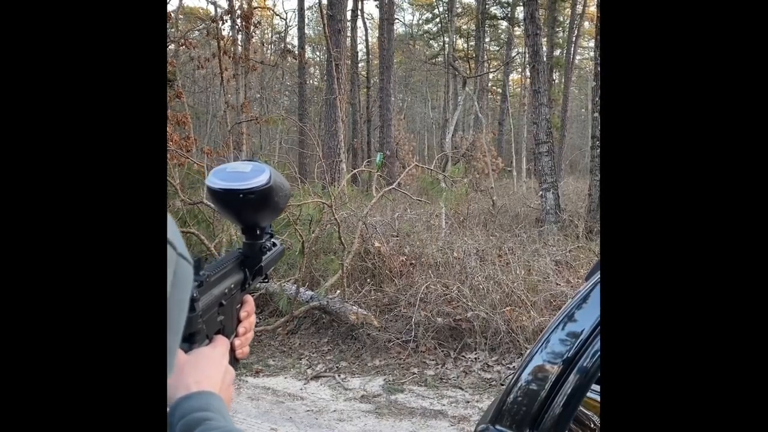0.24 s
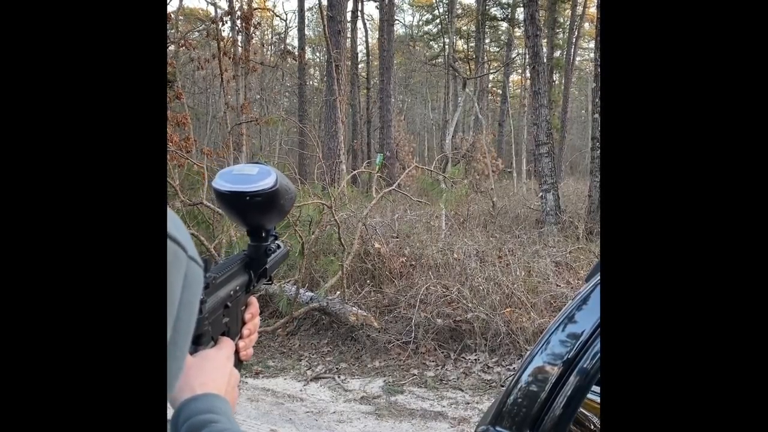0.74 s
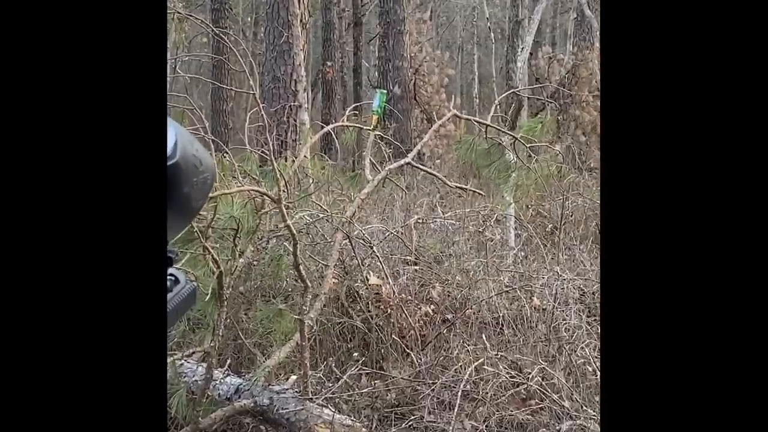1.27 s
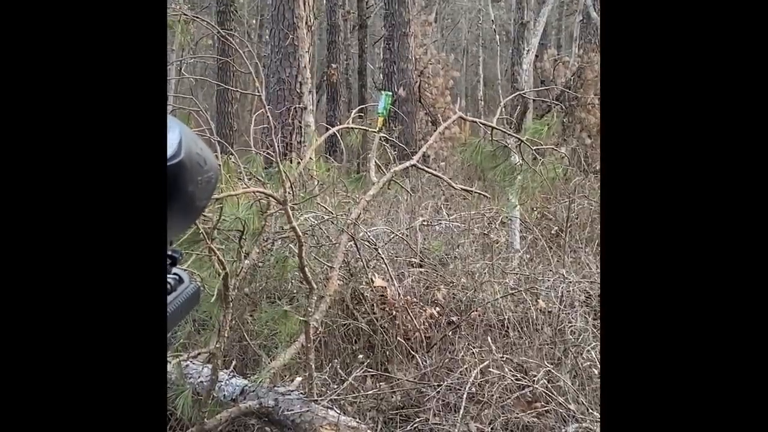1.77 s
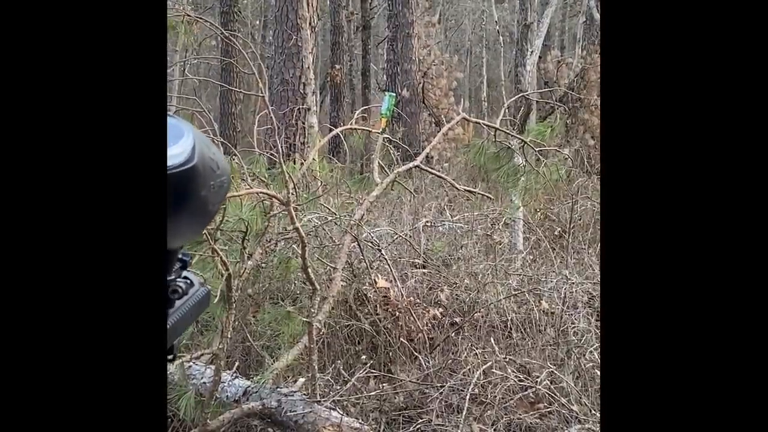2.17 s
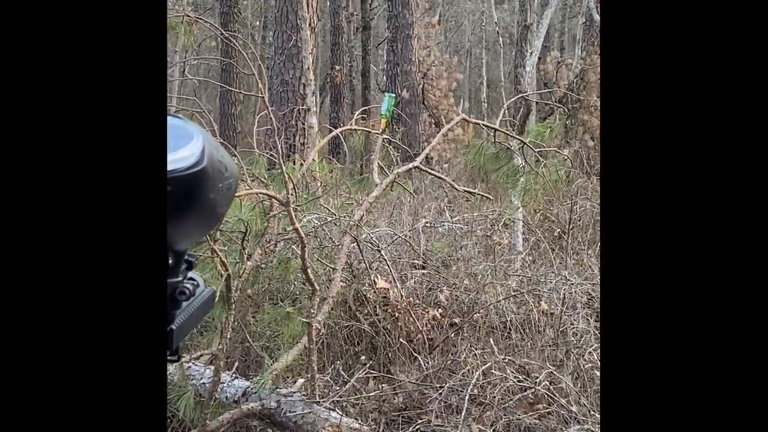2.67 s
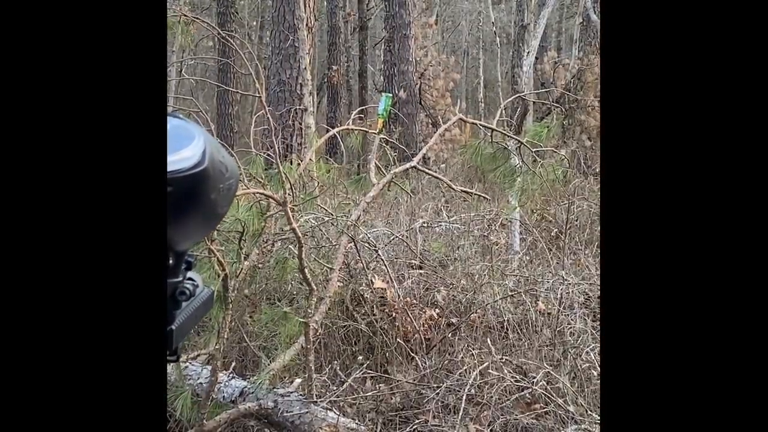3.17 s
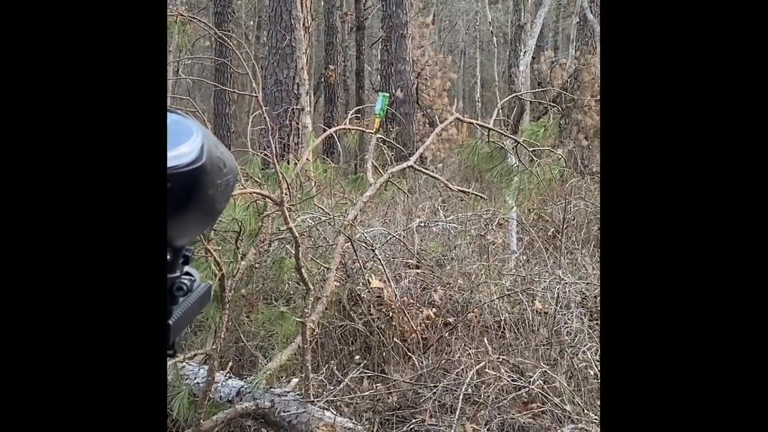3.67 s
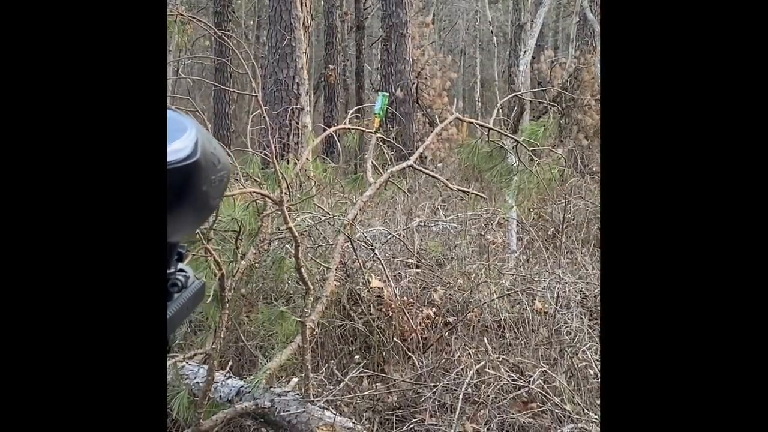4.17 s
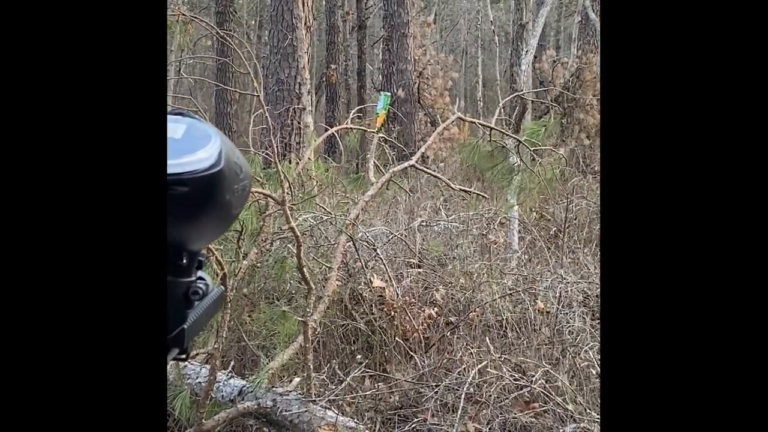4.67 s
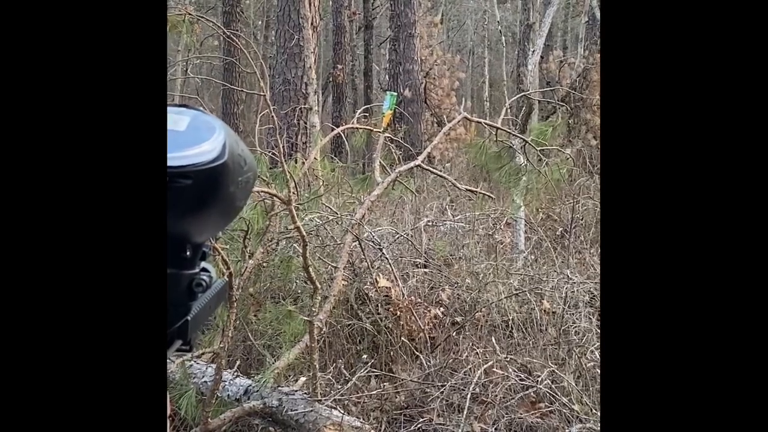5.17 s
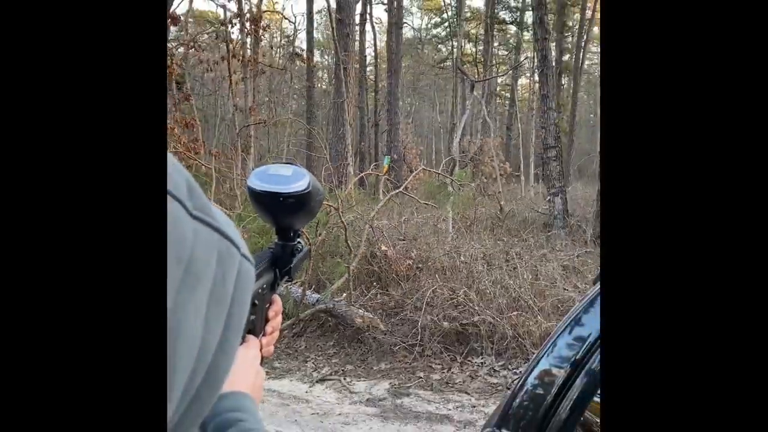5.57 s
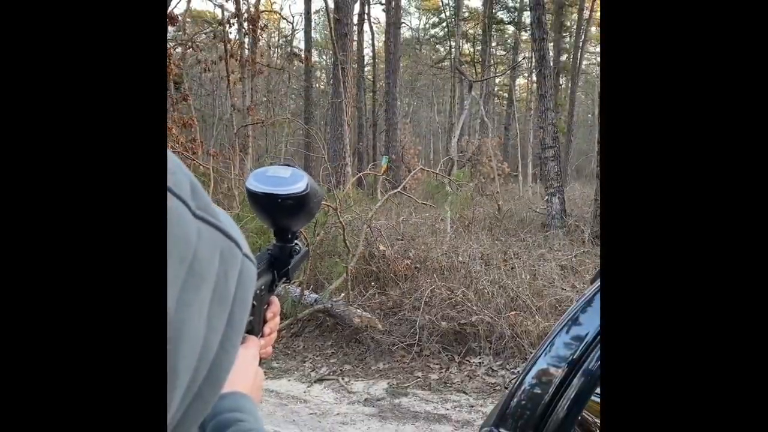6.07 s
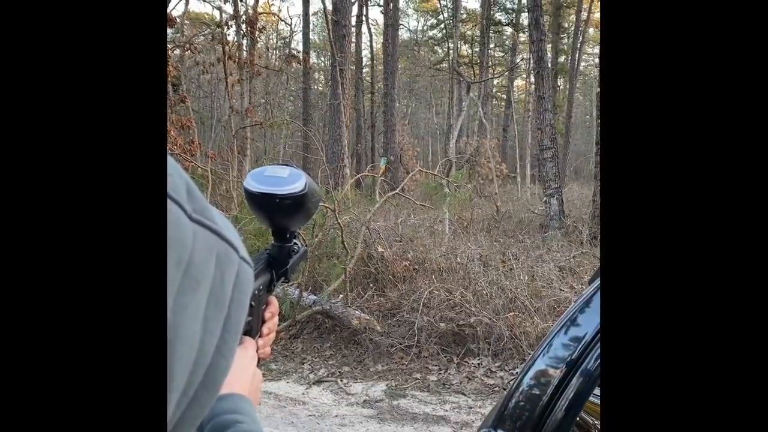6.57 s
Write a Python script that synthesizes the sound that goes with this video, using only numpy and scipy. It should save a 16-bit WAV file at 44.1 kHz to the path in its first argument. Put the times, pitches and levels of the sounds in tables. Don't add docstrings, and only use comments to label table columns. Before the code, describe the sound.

Outdoors in a pine wood, a parked engine idles low while a compressed-gas marker close to the microphone fires six separate shots. Each is a hard metallic clack with a short airy pop and low thump, then a brief diffuse echo from trunks. Four are followed a tenth of a second later by a ball bursting on a thin can, one barely audible. Small trigger clicks follow most shots, and the background dips after every pop.

```python
import sys
import numpy as np
from scipy import signal
from scipy.fft import rfft, irfft, next_fast_len
from scipy.io import wavfile
from scipy.ndimage import uniform_filter1d

SR = 44100
rng = np.random.default_rng(int(sys.argv[2]) if len(sys.argv) > 2 else 0)


def voltage_ratio(level):
    return 10 ** (np.asarray(level, float) / 20)


def generate_wav(sig):
    pcm = np.round(np.clip(np.atleast_2d(sig).T, -1, 1) * 32767).astype(np.int16)
    wavfile.write(sys.argv[1], SR, pcm)


N = 300762
TIME = np.arange(N) / SR


def on_log(hz, table, column):
    table = np.array(table, float)
    return np.interp(np.log(np.maximum(hz, 1)), np.log(table[:, 0]), table[:, column])


def noise(colour, seconds):
    size = int(seconds * SR)
    hz = np.fft.rfftfreq(size, 1 / SR)
    gain = voltage_ratio(on_log(hz, colour, 1)) * np.minimum(hz / colour[0][0], 1) ** 2
    x = irfft(rfft(rng.standard_normal(size)) * gain, size)
    return x / x.std()


def fade(t, t60):
    return (t >= 0) * np.exp(-np.log(1000) * np.maximum(t, 0) / t60)


def add(out, s, x):
    i = int(s * SR)
    x = x[:len(out) - i]
    out[i:i + len(x)] += x


def walk(rate):
    k = int(SR / rate)
    steps = np.repeat(rng.standard_normal(N // k + 1), k)
    w = uniform_filter1d(uniform_filter1d(steps, k), k)[:N]
    return w / w.std()


def ring(x, hz, width_hz):
    return signal.lfilter(*signal.iirpeak(hz, hz / width_hz, SR), x)


# pitch_hz, width_hz, level_db
EXHAUST_MODES = [(37, 15, -7), (76.5, 25.8, 5.5), (101, 34, -7.5), (134, 50, -19), (203.7, 34, -20),
                 (284.8, 12, -19)]
# pitch_hz, density_db
ENGINE_AIR = [(40, -12), (140, -8.5), (500, -24.5), (1000, -23.5), (1800, -36.5), (3000, -41.5),
              (5000, -52), (16000, -55)]


def idle():
    firing_hz = 35.37
    phase = np.cumsum(firing_hz * (1 + 0.0071 * walk(3.2))) / SR
    fired = np.flatnonzero(np.diff(np.floor(phase)))
    chance = rng.standard_normal((len(fired), 2))
    late = (.0012 * SR * chance[:, 0]).astype(int)
    pulses = np.zeros(N)
    pulses[np.clip(fired + late, 0, N - 1)] = voltage_ratio(0.6 * chance[:, 1])
    pipe = np.zeros(N)
    for hz, width, db in EXHAUST_MODES:
        pipe += voltage_ratio(db) * ring(ring(pulses, hz, width), hz, 2 * width) / width
    throb_db = .5 * walk(2) + 1.5 * np.cos(2 * np.pi * phase)
    air = noise(ENGINE_AIR, 6.9)[:N] * voltage_ratio(throb_db)
    return voltage_ratio(-43) * pipe / pipe.std() + voltage_ratio(-47) * air


# pitch_hz, level_db (rms)
WHINE_TONES = [(296, -63), (584, -66.5), (1205, -64), (1868, -78.5), (9230, -92.5), (13830, -92.5)]


def whine():
    drift = np.cumsum(1 + .002 * walk(12)) / SR
    out = np.zeros(N)
    for hz, db in WHINE_TONES:
        flutter_db = 3.5 * walk(20)
        out += voltage_ratio(db + flutter_db) * np.sqrt(2) * np.sin(2 * np.pi * hz * drift)
    return out


# pitch_hz, density_db
WOOD_COLOUR = [(250, -5.5), (700, 1), (1400, -1.5), (3000, -13), (6000, -14.5), (8500, -23.5),
               (11000, -14.5), (16000, -21)]
# pitch_hz, width_hz, level_db
BODY_RINGS = [(3800, 260, -2), (6000, 400, -3)]
# start_s, level_db
FAR_TRUNKS = [(.25, -27), (1.981, -35), (2.021, -31), (2.821, -36), (4.455, -37), (4.51, -33.5),
              (5.743, -37)]


def woods():
    echo_db = -37
    low_tail, hiss = np.zeros(N), np.zeros(N)
    t = np.arange(int(.6 * SR)) / SR
    dull = signal.butter(2, 2200, fs=SR, output="sos")
    for s, *_ in SHOTS:
        tail = noise(WOOD_COLOUR, .6)
        low = signal.sosfilt(dull, tail)
        add(low_tail, s + .01, voltage_ratio(echo_db - 1.5) * low * fade(t, 0.95))
        add(hiss, s + .01, voltage_ratio(echo_db) * (tail - low) * fade(t, 0.85))
    hiss = hiss + sum(voltage_ratio(db) * ring(hiss, hz, width) for hz, width, db in BODY_RINGS)
    lumps = walk(70)
    out = low_tail * voltage_ratio(3.0 * lumps) + hiss * voltage_ratio(.8 * lumps)
    near_trunk = [(s + .05, -37) for s, *_ in SHOTS[:-1]]
    t = t[:int(.06 * SR)]
    swell = 1.5 * (fade(t, .035) - fade(t, .012))
    for s, db in FAR_TRUNKS + near_trunk:
        add(out, s, voltage_ratio(db) * signal.sosfilt(dull, noise(WOOD_COLOUR, .06) * swell))
    return out


# pitch_hz, density_db
RESET_COLOUR = [(700, -3.5), (3000, -10.5), (4300, -4.5), (6500, -7.5), (8500, -3), (11000, 10),
                (14000, -8.5), (16000, -2)]
# start_s, level_db
RESETS = [(0.4527, -22), (2.1111, -25.5), (2.9413, -27), (4.5649, -26), (5.8456, -23.5)]
# start_s, level_db
INJECTOR_TICKS = [(.002, -28.5), (.1226, -42), (.129, -46), (1.022, -53), (1.953, -34.5), (2.4694, -45.5),
                  (3.409, -42.5), (4.155, -56.5), (6.6258, -58.5)]


def trigger():
    out, t = np.zeros(N), np.arange(int(.06 * SR)) / SR
    for s, db in RESETS:
        two_clicks = fade(t, .011) + .9 * fade(t - .0055, .011) + .1 * fade(t, .09)
        click = noise(RESET_COLOUR, .06) * two_clicks
        add(out, s, voltage_ratio(db) * (click + 0.94 * ring(click, 2680, 54)))
    for s, db in INJECTOR_TICKS:
        add(out, s, voltage_ratio(db) * noise(KNOCK_COLOUR, .06) * fade(t, 0.005))
    return out


# pitch_hz, density_db
SPLAT_COLOUR = [(320, -16.5), (600, -6.5), (1400, -4), (2500, -4), (6000, -7), (8500, -6), (14000, -2.5),
                (16000, -35.5)]
# start_s, splat_db, ring_db
HITS = [
    (0.2779, -8, 1.5),
    (1.939, -29, -27),
    (4.3807, -10.5, -1.5),
    (5.642, -17, 1.2),
]
HIT_SPOTS = (0, 0, 1, 2)
# pitch_hz, t60_s, rim_db, shoulder_db, wall_db
CAN_MODES = [(3134, .14, -44, -23, -19), (3204, .25, -40, -26, -37), (4300, .12, -52, -49, -40),
             (4715, .15, -50, -33, -28), (5850, .15, -54, -31, -39), (6190, .14, -22, -34, -45),
             (7240, .12, -60, -36, -32), (8310, .12, -36, -41, -32), (9070, .13, -26, -56, -48),
             (11450, .25, -35, -50, -60), (11800, .2, -54, -49, -50), (12650, .16, -56, -42, -46),
             (13230, .13, -62, -40, -55), (14410, .07, -42, -35, -36)]


def can():
    out, t = np.zeros(N), np.arange(int(.6 * SR)) / SR
    for (s, splat_db, ring_db), spot in zip(HITS, HIT_SPOTS):
        wall = np.zeros(len(t))
        for (hz, t60, *db), phase in zip(CAN_MODES, rng.random(len(CAN_MODES))):
            decay = fade(t, t60) + voltage_ratio(-22) * fade(t, .8)
            wall += voltage_ratio(ring_db + db[spot]) * decay * np.sin(2 * np.pi * (hz * t + phase))
        tail = fade(t - .02, 1.0) + 2.3 * fade(t - .095, 0.12)
        echoes = voltage_ratio(-49.5) * rng.standard_normal(len(t)) * tail
        burst = noise(SPLAT_COLOUR, .6) * (1.8 * fade(t, 0.003) + 0.031 * fade(t, 0.052))
        add(out, s, wall + voltage_ratio(splat_db) * burst)
        add(out, s, signal.fftconvolve(wall, signal.lfilter([.5], [1, -.5], echoes)))
    return out


# start_s (of the pop), pop_db, knock_db
SHOTS = [
    (0.1801, -9.5, 5.5),
    (1.8415, -10.5, 2),
    (2.656, -10.5, 1),
    (4.2799, -10, 3),
    (5.544, -11, -1),
    (6.8027, -8.5, 0.5),
]
# pitch_hz, density_db
POP_COLOUR = [(600, -7.5), (900, 0), (2100, -9.5), (3500, -6.5), (4300, -20.5), (6000, -20), (11000, -31.5),
              (16000, -31.5)]
# pitch_hz, density_db
BOLT_COLOUR = [(320, -2.5), (1100, -4.5), (2100, -3), (4300, 0.5), (8500, -12.5), (11000, -31),
               (14000, -23.5), (16000, -38.5)]
# pitch_hz, density_db
KNOCK_COLOUR = [(1500, -10), (3000, -5.5), (4500, -10.5), (6000, -7.5), (7000, -15), (9000, -9.5),
                (13000, -9), (16000, -23)]
# start_s (after the pop), level_db, t60_s
KNOCKS = [
    (-.019, -37.5, 0.015),
    (-.013, -36, .012),
    (0, -10, 0.011),
    (.0045, -11.5, 0.0064),
    (.0085, -12.5, 0.01),
    (0.0174, -30, .01),
]
# pitch_hz, level_db, centre_s (after the pop), length_s
THUMP_TONES = [(119, -10, .0085, 0.0037), (319.4, -14.5, .0078, 0.0066), (409, -12, 0.0053, 0.0051),
               (560, -19.5, 0.0042, 0.0044), (915, -11.5, 0.0024, 0.0056), (1210, -21, 0.00291, 0.0088),
               (2630, -16.5, .001, 0.0037)]


def marker():
    lead = .02
    barrel_hz, barrel_echo = 294, 0.081
    bolt_db = (-26, -36)
    out = np.zeros(N)
    t = np.arange(int(.12 * SR)) / SR - lead
    shared_jet = noise(POP_COLOUR, .12)
    thump = np.zeros(len(t))
    for hz, db, at, span in THUMP_TONES:
        thump += voltage_ratio(db) * np.sin(2 * np.pi * hz * (at - t)) * np.exp(-((t - at) / span) ** 2)
    knocks = sum(voltage_ratio(db) * fade(t - at, t60) for at, db, t60 in KNOCKS)
    sputter = 0.29 + np.cos(np.pi * t / .0016) ** 4
    emptying = np.minimum(fade(t - .009, 0.041) + (t < .009), 1) * (t >= 0)
    blast = emptying * sputter + 0.076 * fade(t, 0.16)
    run = (1.1 * (t > -.019) + 5.0 * np.exp(np.minimum(t, 0) / 0.00095)) * (t < 0)
    lag = int(SR / (2 * barrel_hz))
    barrel = np.r_[1, np.zeros(lag - 1), barrel_echo]
    for s, pop_db, knock_db in SHOTS:
        gas = 1.2 * shared_jet + .55 * noise(POP_COLOUR, .12)
        pop = 0.78 * voltage_ratio(pop_db) * signal.lfilter([1], barrel, gas * blast)
        metal = voltage_ratio(knock_db) * knocks * noise(KNOCK_COLOUR, .12)
        slide = voltage_ratio(bolt_db[setting(s)]) * run * noise(BOLT_COLOUR, .12)
        add(out, s - lead, pop + thump + metal + slide)
    return out


ZOOM_IN_S, ZOOM_OUT_S = 0.74, 5.2


def setting(s):
    return int(ZOOM_IN_S < s < ZOOM_OUT_S)


def gain_control():
    duck_db = (-25.5, -14)
    db = 7 * (TIME < SHOTS[0][0])
    for s, *_ in SHOTS:
        recovery = 1 + (np.maximum(TIME - s, 0) / 0.081) ** 3
        db = db + duck_db[setting(s)] * (TIME > s) / recovery
    return voltage_ratio(db)


def right_port(near, ambient, table):
    size = next_fast_len(N + 8192)
    hz = np.fft.rfftfreq(size, 1 / SR)
    out = 0
    for x, column, count in ((near, 3, 129), (ambient, 4, 2049)):
        scatter = rfft(irfft(np.exp(2j * np.pi * rng.random(count))), size)
        share = np.clip(on_log(hz, table, column), 0, 1)
        direct = np.sqrt(1 - share ** 2) * np.exp(1j * on_log(hz, table, 2))
        out = out + rfft(x, size) * (direct + share * scatter)
    return irfft(out * voltage_ratio(on_log(hz, table, 1)), size)[:N]


# pitch_hz, level_db, phase_rad, near_share, ambient_share (unrelated, 0-1)
WIDE_PORT = [(150, -.8, 0, .08, .1), (450, -6, -.3, .22, .4), (900, -12, .4, .4, .85),
             (2400, -1.5, -1.1, .35, .82), (3500, -.5, -3.1, .5, .95), (5800, 0, -3.5, .6, .8),
             (10500, 0, -3, .15, .1), (15000, 0, -4.9, .4, .75)]
# pitch_hz, level_db, phase_rad, near_share, ambient_share (unrelated, 0-1)
ZOOM_PORT = [(150, -.6, 0, .08, .1), (450, -4, -.2, .17, .2), (950, -10, .1, .25, .7),
             (1900, -.7, -.4, .14, .4), (3500, 0, -.7, .1, .4), (6700, 0, -2, .27, .55),
             (11200, 0, -3.3, .15, .1), (15000, 0, -4.8, .3, .75)]
# pitch_hz, level_db
WIDE_LIFT = [(1500, 1.5), (2500, 5), (5000, 8), (8000, 9), (12000, -1)]


def scene():
    gain = gain_control()
    near = marker() + can() + trigger() + woods() + whine() * gain
    ambient = idle() * gain
    zoomed = uniform_filter1d(1. * (TIME > ZOOM_IN_S) * (TIME < ZOOM_OUT_S), size=1000)
    wide = 1 - zoomed
    lift = voltage_ratio(on_log(np.fft.rfftfreq(N, 1 / SR), WIDE_LIFT, 1))
    lifted = irfft(rfft(ambient) * lift, N)
    left = near + zoomed * ambient + wide * lifted
    right = zoomed * right_port(near, ambient, ZOOM_PORT) + wide * right_port(near, lifted, WIDE_PORT)
    return np.array([left, right])


def roll_off(x):
    return signal.sosfilt(signal.butter(12, 16800, fs=SR, output="sos"), x)


def record(dry):
    top = signal.ellip(8, .2, 60, 16100, fs=SR, output="sos")
    limited = .95 * np.tanh(signal.sosfilt(top, dry) / .95)
    return roll_off(limited)


dry = scene()
out = record(dry)
generate_wav(out)
```